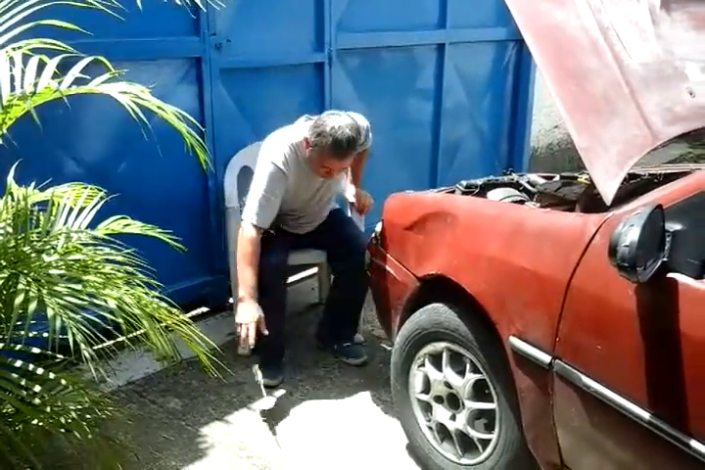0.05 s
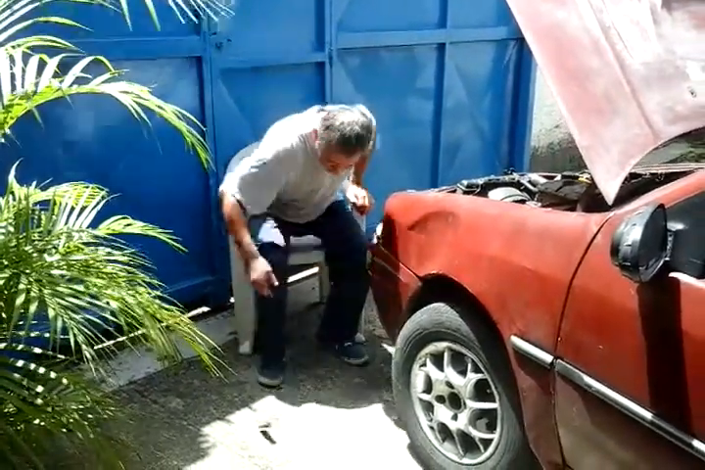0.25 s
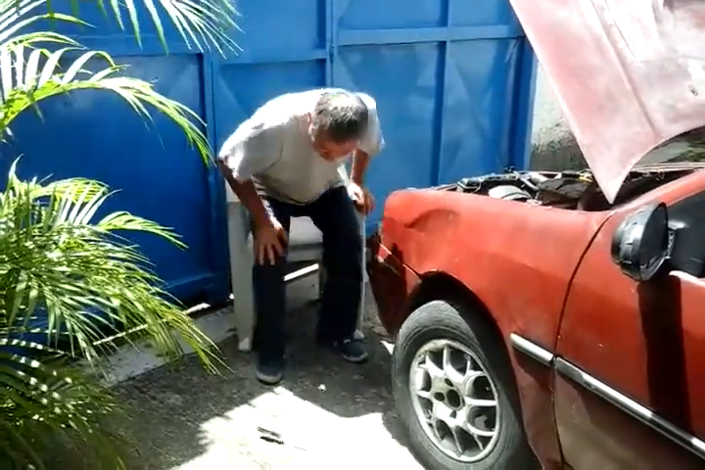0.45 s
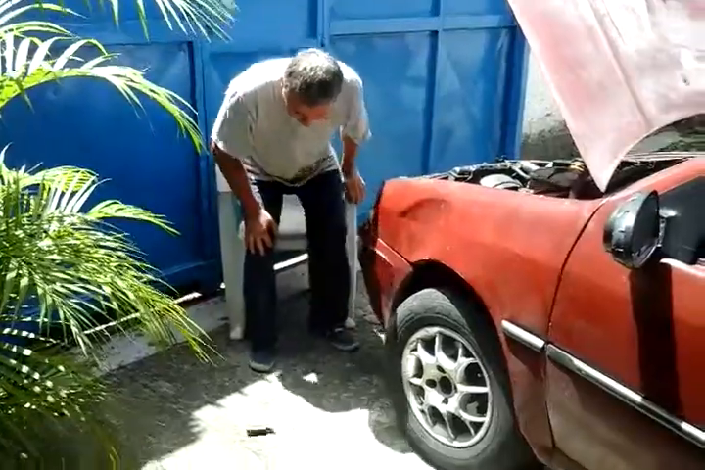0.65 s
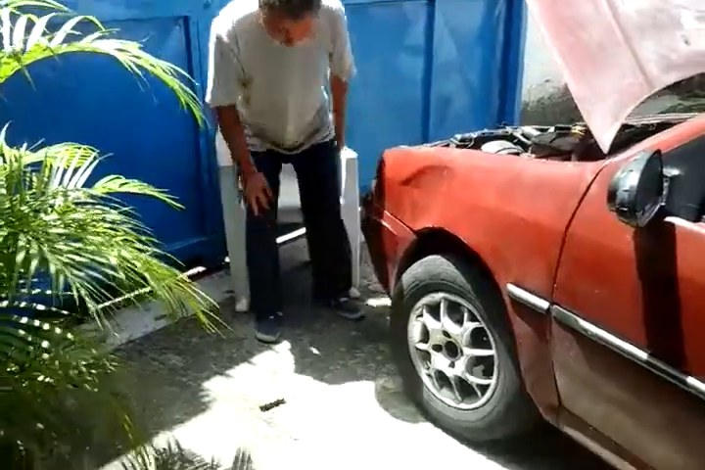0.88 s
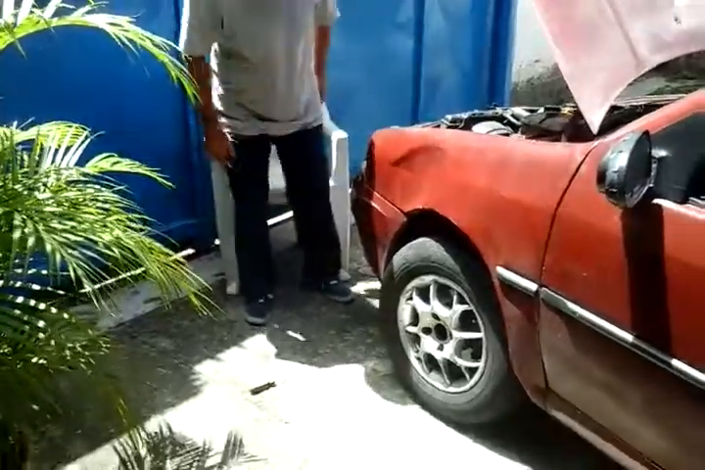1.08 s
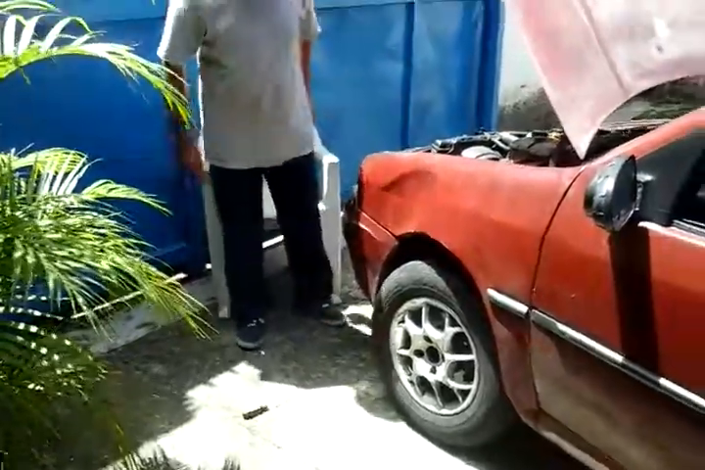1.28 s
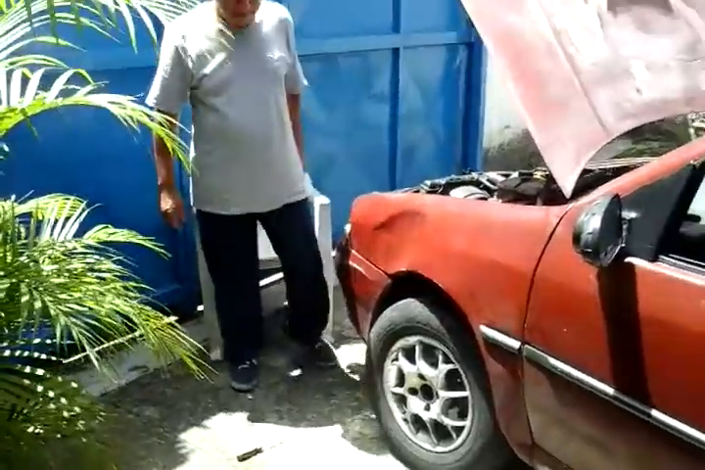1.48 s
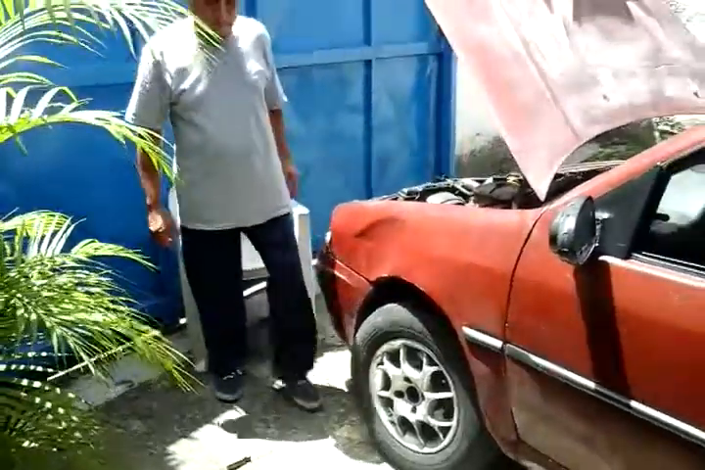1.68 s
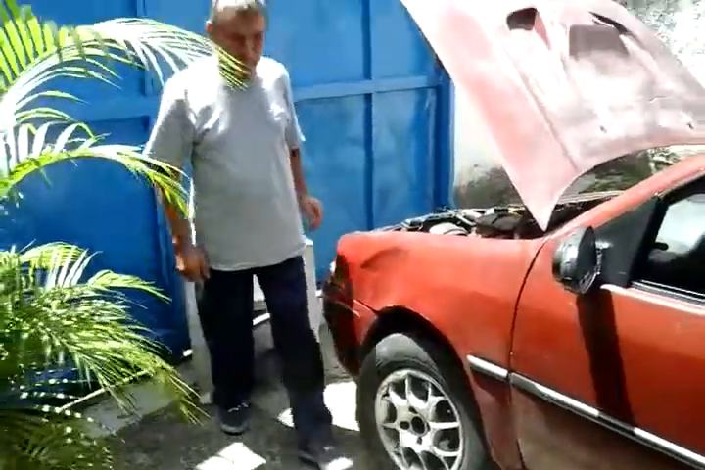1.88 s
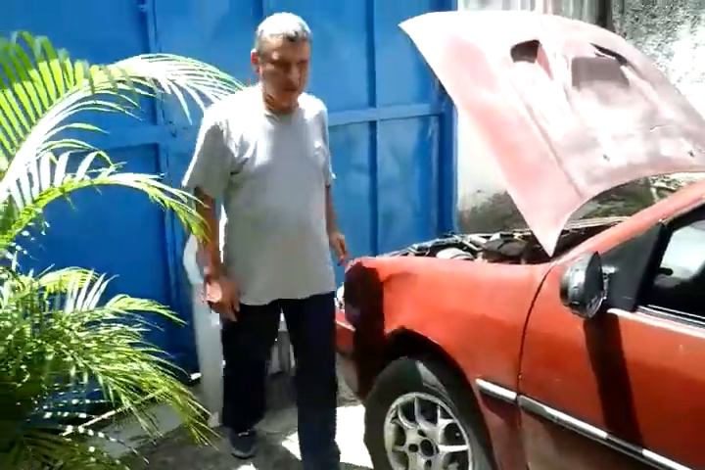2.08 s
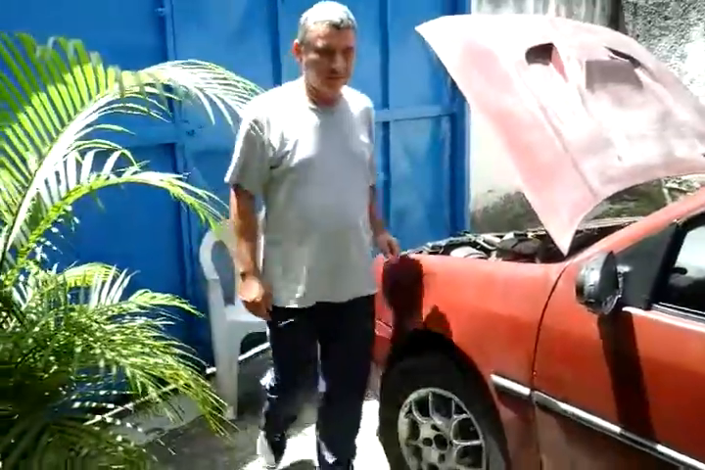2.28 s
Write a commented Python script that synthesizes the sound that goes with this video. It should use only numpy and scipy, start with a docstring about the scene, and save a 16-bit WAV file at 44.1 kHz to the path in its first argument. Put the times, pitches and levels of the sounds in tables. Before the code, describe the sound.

A metal tool clinks sharply on the concrete ground nearby, then bounces twice more softly and settles. Light shoe clicks, one bird chirp and a soft leafy rustle follow, over quiet outdoor hiss and a far motor's hum.

```python
"""Outdoor hiss and a far motor's hum fill a walled yard. A small steel tool drops on concrete:
both ends strike and set its modes ringing, it bounces, and rings briefly as it settles.
Shoes click and scuff on the ground. Near the end a small bird chirps once in two falling voices
and a soft high hiss swells, like rustling leaves.
The two microphone ports differ in colour and are of opposite polarity."""
import sys
import numpy as np
from scipy import signal
from scipy.fft import rfft, irfft
from scipy.io import wavfile

SR = 44100
rng = np.random.default_rng(int(sys.argv[2]) if len(sys.argv) > 2 else 0)


def transcribe(signal):
    """Save signal, clipped to [-1, 1], as a 16-bit WAV file at the path in sys.argv[1]."""
    frames = np.atleast_2d(signal).T
    limited = np.clip(frames, -1, 1)
    pcm = np.round(limited * 32767).astype(np.int16)
    wavfile.write(sys.argv[1], SR, pcm)


N = 108045


def amp(db):
    """dB to gain."""
    return 10 ** (np.asarray(db) / 20)


def unit(x):
    """Scale to rms 1."""
    return x / np.sqrt(np.mean(x ** 2) + 1e-20)


def read(points, hz):
    """Interpolate on a log-frequency axis."""
    f, value = np.transpose(points)
    return np.interp(np.log(hz + 1), np.log(f + 1), value)


def add(mix, start_s, sound):
    """Mix a sound in at start_s."""
    part = mix[max(round(start_s * SR), 0):][:len(sound)]
    part += sound[:len(part)]


def colour(x, db_at, size=4096):
    """Minimum-phase filter with gain db_at(f)."""
    log_gain = np.log(amp(np.maximum(db_at(abs(np.fft.fftfreq(size, 1 / SR))), -100)))
    taps = np.fft.ifft(np.exp(np.conj(signal.hilbert(log_gain)))).real[:size // 2]
    return signal.fftconvolve(x, taps)[:len(x)]


def hump(hz, octaves):
    """Resonance curve, dB against frequency."""
    return lambda f: -20 * np.log10(1 + (np.log2((f + 1) / hz) / octaves) ** 2 / 2)


def drift(rate_hz):
    """Smooth random wander, rms 1."""
    lowpass = np.exp(-(np.fft.rfftfreq(N, 1 / SR) / rate_hz) ** 2)
    return unit(irfft(rfft(rng.standard_normal(N)) * lowpass, N))


# outdoor noise spectrum: f/Hz, relative level/dB
AIR_SPECTRUM = [(20, -3), (35, -10), (60, -6), (110, 0), (170, 6), (250, 1), (450, -1), (650, -3),
                (950, -3.5), (1400, -8), (2200, -8), (3000, -8.5), (3700, -4.5), (4200, -5.5), (4650, 0),
                (5100, -5), (5600, -10.5), (7200, -13.5), (8300, -17), (9500, -14), (11200, -13.5),
                (12300, -18.5), (14500, -31)]
# likeness of that noise at the two ports: f/Hz, correlation
AIR_CORRELATION = [(30, .5), (150, 0.98), (350, 0.6), (700, 0.3), (1400, 0), (15000, 0.017)]


def air(wash_db=-49.5, hiss_db=-56.5, hiss_hz=3480, hiss_end_s=0.31):
    """Steady outdoor noise, shared by the ports in the bass, and a thin hiss that stops early."""
    hz, t = np.fft.rfftfreq(N, 1 / SR), np.arange(N) / SR
    left, independent = rfft(rng.standard_normal((2, N)))
    shared = np.clip(read(AIR_CORRELATION, hz), -1, 1)
    right = shared * left + np.sqrt(1 - shared ** 2) * independent
    wash = irfft(np.array([left, right]) * amp(read(AIR_SPECTRUM, hz)), N)
    hiss = irfft(rfft(rng.standard_normal((2, N))) * amp(hump(hiss_hz, octaves=0.1)(hz)), N)
    fade = np.clip((hiss_end_s - t) * 10, 0, 1)
    return amp(wash_db + 0.21 * drift(rate_hz=8.6)) * unit(wash) + amp(hiss_db) * unit(hiss) * fade


# motor run: t/s, f/Hz, level/dB
MOTOR_RUN = [(0, 104.1, -55), (.25, 102.2, -53.5), (.55, 102.3, -48.5), (.88, 102, -52.5),
             (1.1, 101.5, -49), (1.38, 100.9, -44), (1.801, 100.2, -48.5), (2.05, 99.8, -44.5),
             (2.3, 99, -45.5), (2.45, 98.9, -49.5)]
# motor orders: multiple of f, relative level before the tone shift/dB, after/dB
MOTOR_ORDERS = [(1.5, -2, -16.5), (2, -1.5, -0.5), (3, -8, -10.5), (4, -4, -9.5), (5, -6.5, -13),
                (6, -12.5, -19), (7, -21, -20.5)]


def motor(waver=0.0017, flutter_db=1.6, shift_s=0.96, port_phase_rad=0.13):
    """A far hum swells and shifts its tone once; it reaches the ports slightly out of step."""
    times_s, hz, db = np.transpose(MOTOR_RUN)
    t = np.arange(N) / SR
    pitch_hz = np.interp(t, times_s, hz) * (1 + waver * drift(rate_hz=7.1))
    angle = 2 * np.pi * np.cumsum(pitch_hz) / SR + np.array([[0], [port_phase_rad]])
    shift = 0.5 + 0.5 * np.tanh((t - shift_s) * 10)
    hum = np.zeros((2, N))
    for order, before_db, after_db in MOTOR_ORDERS:
        order_db = before_db + (after_db - before_db) * shift + flutter_db * drift(rate_hz=5.1)
        hum += amp(order_db) * np.sin(order * angle + 2 * np.pi * rng.random())
    return amp(np.interp(t, times_s, db)) * hum


# tool contacts: t/s, level/dB, relative ring level/dB, treble edge/Hz
TOOL_CONTACTS = [(0.2337, 1, -18, 8070), (0.2407, 3.5, -8, 11400), (0.2429, -7, -12, 8800),
                 (0.4719, -25, -17, 9000), (.4785, -22.5, -9, 12000), (0.4818, -13, -8.5, 9200),
                 (.4875, -23, -12, 8900), (.6075, -33, 4, 9900), (0.614, -36, 0, 10000)]
# crack of steel on concrete: f/Hz, level/dB
CRACK_SPECTRUM = [(30, -38), (90, -16), (300, -8), (700, -6), (1500, 1.5), (2300, -5), (2900, 6.5),
                  (3500, 8), (4400, 12), (5400, 19), (6200, 7), (7100, 14), (8000, 8.5), (8900, -5.5),
                  (10500, -1), (12300, -4), (14500, -31)]
# tool modes: f/Hz, level/dB, T60/s
TOOL_MODES = [(3520, -36, 0.057), (4250, -59, 0.044), (4780, -29, 0.067), (5010, -31, 0.087),
              (5340, -31, .1), (5570, -35, 0.036), (6700, -24, 0.086), (7115, -31.5, .07),
              (7750, -28, 0.069), (10800, -34, 0.056), (11600, -52, .05)]


def tool(ground_echo_s=0.00085, grit_db=-4.5, grit_hz=10500, grit_decay_s=0.011, ring_low_hz=1450):
    """Each contact is a sharp crack with a quick ground echo; it rings the steel and crushes grit."""
    t, out = np.arange(SR // 2) / SR, np.zeros(N)
    push = signal.unit_impulse(len(t))
    add(push, ground_echo_s, np.array([0.18]))
    crack = colour(push, lambda f: read(CRACK_SPECTRUM, f))
    ring = sum(amp(db - 60 * t / t60_s) * np.sin(2 * np.pi * hz * t) for hz, db, t60_s in TOOL_MODES)
    ring = signal.sosfilt(signal.butter(2, ring_low_hz, "high", fs=SR, output="sos"), ring)
    for start_s, db, ring_db, edge_hz in TOOL_CONTACTS:
        burst = rng.standard_normal(len(t)) * np.exp(-t / grit_decay_s)
        grit = amp(grit_db) * colour(burst / np.linalg.norm(burst), hump(grit_hz, octaves=0.28))
        contact = crack + grit + amp(ring_db) * ring
        add(out, start_s, amp(db) * colour(contact, lambda f: -10 * np.log10(1 + (f / edge_hz) ** 8)))
    return out


# shoe clicks and knocks: t/s, level/dB, centre f/Hz
SHOE_CLICKS = [(0.414, -10, 2220), (.472, -6, 1100), (.602, -19, 1200), (1.9227, -7, 3100),
               (1.9315, -9, 3680), (1.9394, -24, 4600), (2.11, -13, 3000), (2.2205, -30, 3700),
               (2.398, -25, 4700)]
# three low scuffs, then a high hiss: peak t/s, half-length/s, level/dB, centre f/Hz, width/octaves
NOISE_SWELLS = [(0.431, 0.063, -49.5, 540, 0.84), (0.615, 0.075, -56, 470, 1),
                (1.389, 0.067, -66, 448.2, 0.65), (2.126, .12, -60.5, 3400, .6)]


def shoes_and_rustle(click_decay_s=0.0012, shelf_hz=5300):
    """Shoes click and scuff; a soft high hiss, like rustling leaves, swells near the end."""
    t, out = np.arange(N) / SR, np.zeros(N)
    for start_s, db, hz in SHOE_CLICKS:
        burst = rng.standard_normal(2048) * np.exp(-t[:2048] / click_decay_s)
        add(out, start_s, amp(db) * colour(burst / np.linalg.norm(burst), hump(hz, octaves=0.55)))
    for peak_s, half_s, db, hz, octaves in NOISE_SWELLS:
        band = unit(colour(rng.standard_normal(N), hump(hz, octaves)))
        out += amp(db) * np.exp(-((t - peak_s) / half_s) ** 2) * band
    return colour(out, lambda f: np.maximum(-10 * np.log10(1 + (f / shelf_hz) ** 20), -10))


# modes of the settling tool: peak t/s, f/Hz, level/dB, rise/s, fall/s
SETTLING_MODES = [(0.484, 4900, -25.5, .003, 0.0053), (0.487, 5040, -30.5, 0.0017, 0.0094),
                  (0.616, 5410, -34.5, 0.0059, 0.0037), (.619, 7530, -47.5, .008, .016)]


def settling():
    """Single modes swell and die as the tool turns over and rocks to rest."""
    t, out = np.arange(N) / SR, np.zeros(N)
    for peak_s, hz, db, rise_s, fall_s in SETTLING_MODES:
        swell = np.exp(-np.maximum((peak_s - t) / rise_s, (t - peak_s) / fall_s))
        out += amp(db) * swell * np.sin(2 * np.pi * hz * t)
    return out


# bird voices: t/s, length/s, start f/Hz, target f/Hz, level/dB
BIRD_VOICES = [(2.095, 0.048, 7230, 5710, -41), (2.103, 0.043, 9330, 7160, -50.5)]


def bird(glide_s=0.017):
    """One chirp: two pure voices slide down together."""
    out = np.zeros(N)
    for start_s, length_s, start_hz, target_hz, db in BIRD_VOICES:
        t = np.arange(0, length_s, 1 / SR)
        hz = target_hz + (start_hz - target_hz) * np.exp(-t / glide_s)
        envelope = np.sin(np.pi * (t / length_s) ** 0.51) ** 2
        add(out, start_s, amp(db) * envelope * np.sin(2 * np.pi * np.cumsum(hz) / SR))
    return out


# echoes off gate, car and walls: delay/s, relative gain left, right
YARD_ECHOES = [(.0021, .08, .22), (.0042, .17, .08), (.0059, 0.091, .16), (.0083, .1, .22),
               (0.0175, .08, .14)]
# decay between the walls: f/Hz, T60/s
YARD_DECAY = [(200, 0.47), (1500, 0.47), (3500, 0.48), (5000, 0.49), (7000, 0.38), (12000, 0.37)]


def yard(x, near_db, tail_db, scatter_db=-7, scatter_t60_s=0.07):
    """Direct sound, echoes and quick scatter from things nearby, and the tail between the walls."""
    t = np.arange(SR) / SR
    hz, frame_s, spectra = signal.stft(rng.standard_normal((2, SR)), SR, nperseg=256)
    decay = amp(-60 * frame_s / read(YARD_DECAY, hz)[:, None])
    tail = signal.istft(spectra * decay, SR, nperseg=256)[1][:, :SR]
    tail *= np.clip(t / 0.0091 - 0.3, 0, 1)  # fades in from 3 to 12 ms
    scatter = rng.standard_normal((2, SR)) * amp(-60 * t / scatter_t60_s) * (t > 0.002)
    near = amp(scatter_db) * unit(scatter) / np.sqrt(SR)
    for delay_s, left, right in YARD_ECHOES:
        near[:, round(delay_s * SR)] += left, right
    response = amp(tail_db) * unit(tail) / np.sqrt(SR) + amp(near_db) * near
    return x + signal.fftconvolve(x[None], response, axes=1)[:, :N]


def scene():
    """Tool, shoes, rustle and bird echo in the yard over the air and the motor."""
    events = yard(tool(), near_db=3, tail_db=-4)
    events += yard(settling(), near_db=-4, tail_db=-5.5)
    events += yard(shoes_and_rustle(), near_db=3, tail_db=0.5)
    events += yard(bird(), near_db=0, tail_db=0.5)
    return events + motor() + air()


# port balance: f/Hz, left over right/dB
PORT_BALANCE = [(100, 1.5), (700, 0.5), (1500, -3.5), (2500, -5), (3400, -7.5), (4400, -12.5), (5200, -10),
                (6000, 3.5), (6900, 2), (7700, 5), (9500, 4), (12000, 2.5)]


def record(dry, right_lag_s=0.00003, ceiling=1.3, edge_hz=14900):
    """Two ports, each with its own colour, the right inverted and late; soft overload, band limit."""
    left = colour(dry[0], lambda f: 10 * np.log10(2 / (1 + amp(-read(PORT_BALANCE, f)) ** 2)))
    right = colour(dry[1], lambda f: 10 * np.log10(2 / (1 + amp(read(PORT_BALANCE, f)) ** 2)))
    lag = np.exp(-2j * np.pi * np.fft.rfftfreq(N, 1 / SR) * right_lag_s)
    right = -irfft(rfft(right) * lag, N)
    clipped = ceiling * np.tanh(np.array([left, right]) / ceiling)
    lowpass = signal.firwin(401, edge_hz, window=("kaiser", 9), fs=SR)
    return signal.oaconvolve(clipped, lowpass[None], "same")


dry = scene()
out = record(dry)
transcribe(out)
```